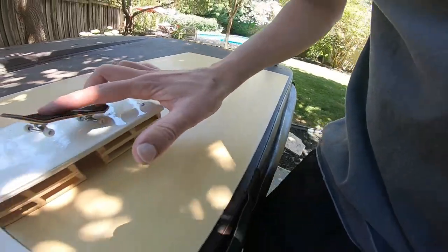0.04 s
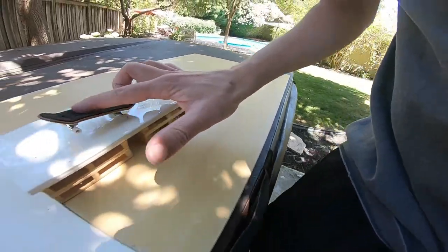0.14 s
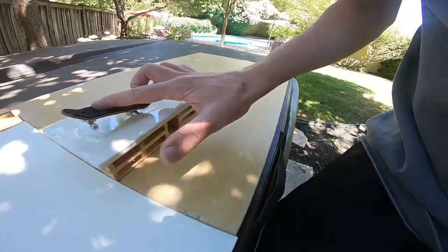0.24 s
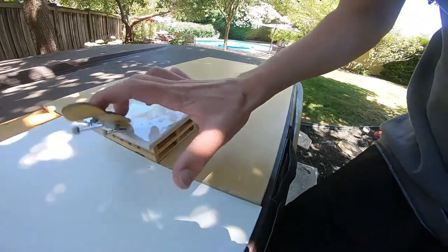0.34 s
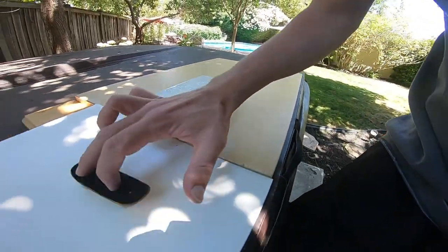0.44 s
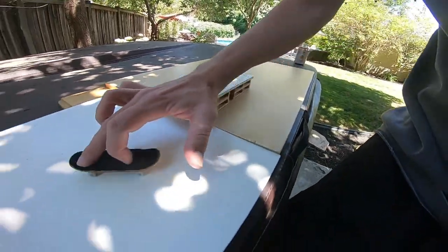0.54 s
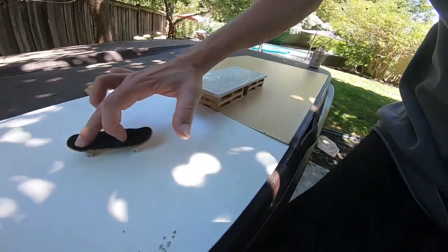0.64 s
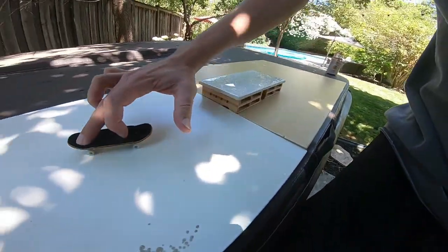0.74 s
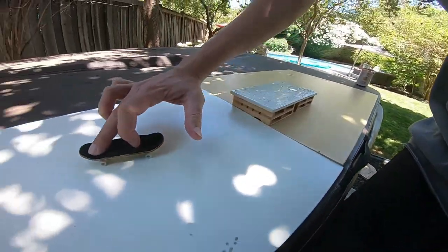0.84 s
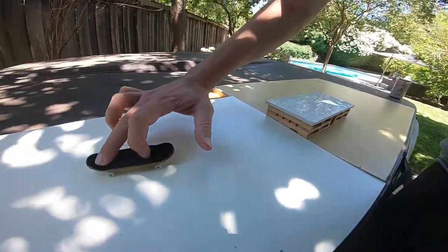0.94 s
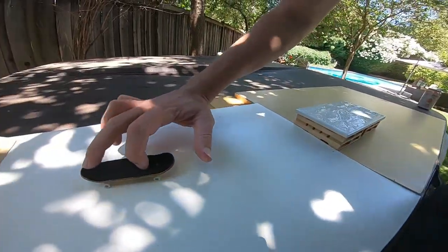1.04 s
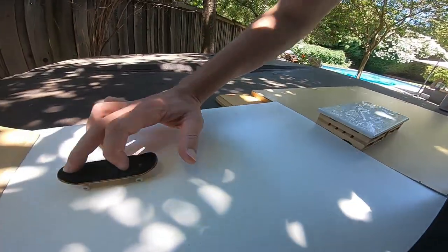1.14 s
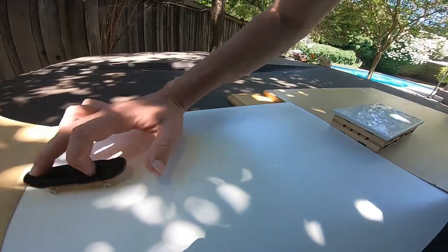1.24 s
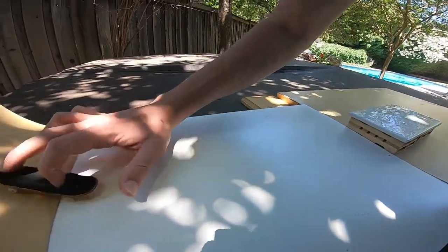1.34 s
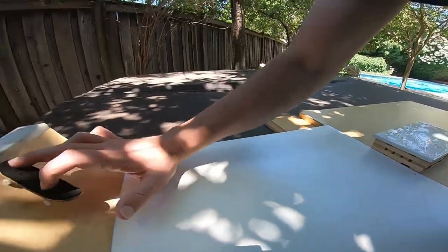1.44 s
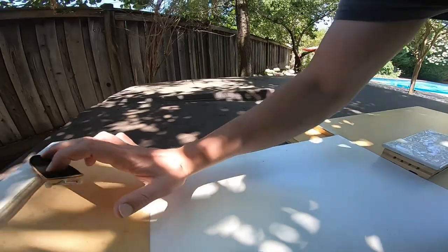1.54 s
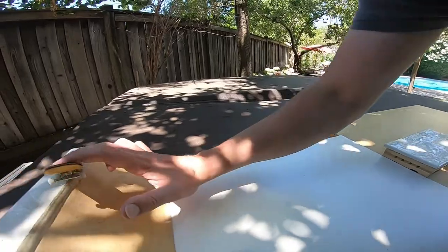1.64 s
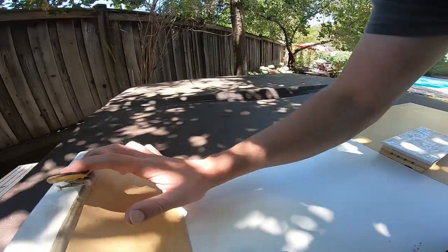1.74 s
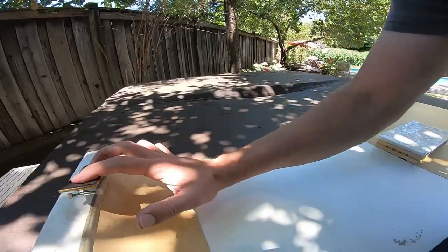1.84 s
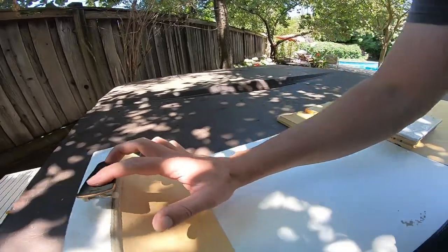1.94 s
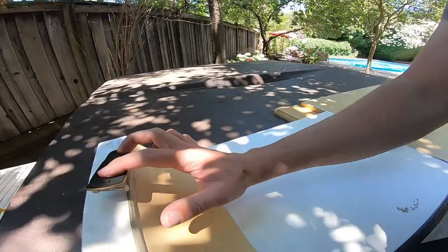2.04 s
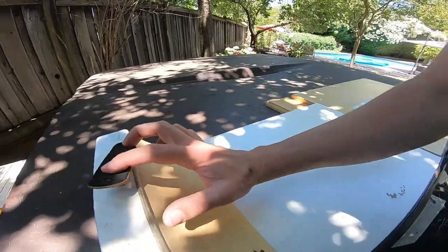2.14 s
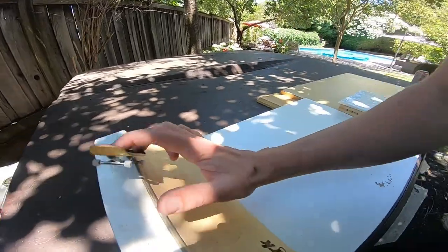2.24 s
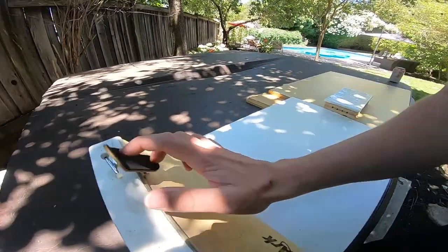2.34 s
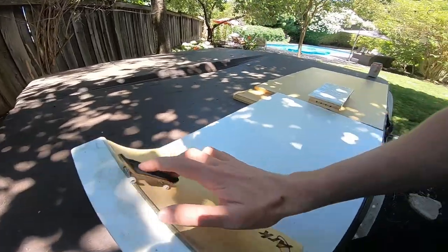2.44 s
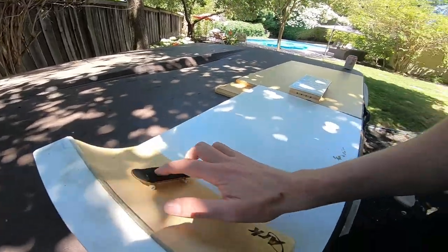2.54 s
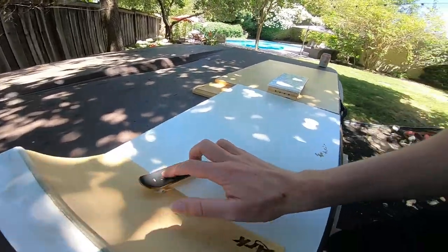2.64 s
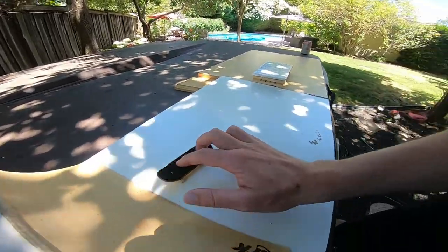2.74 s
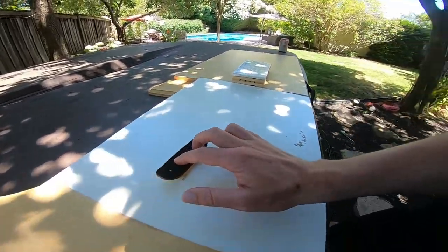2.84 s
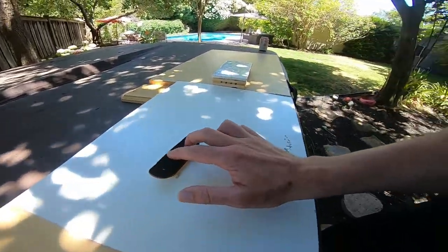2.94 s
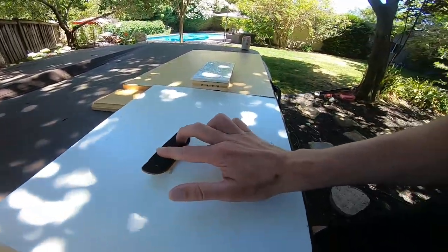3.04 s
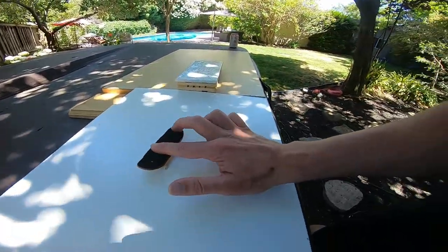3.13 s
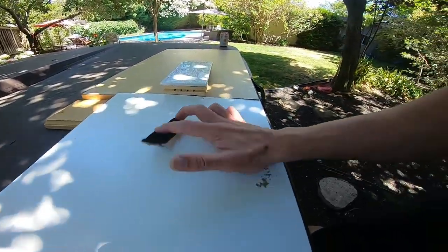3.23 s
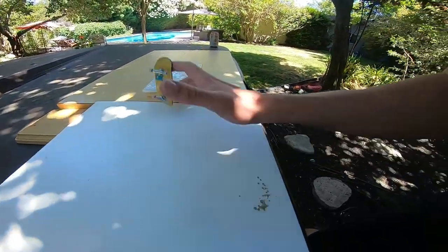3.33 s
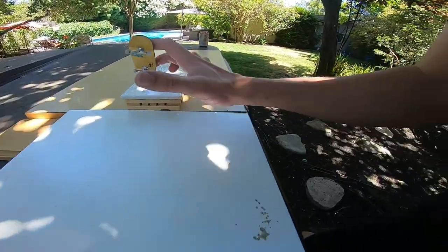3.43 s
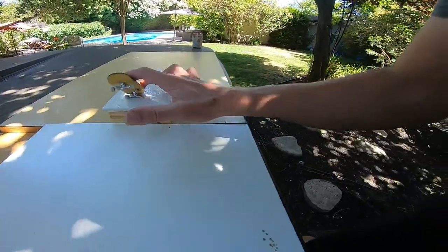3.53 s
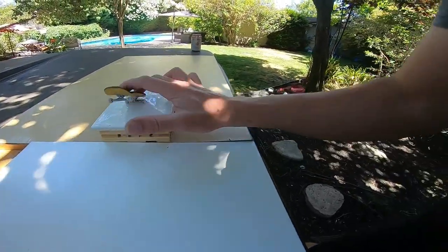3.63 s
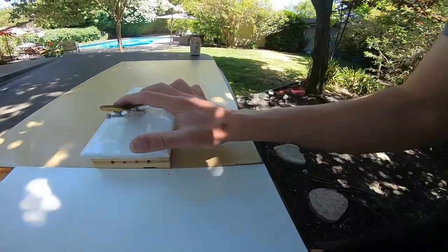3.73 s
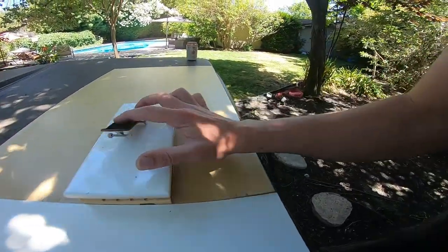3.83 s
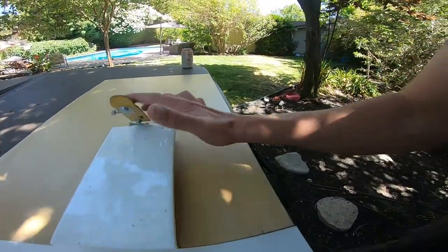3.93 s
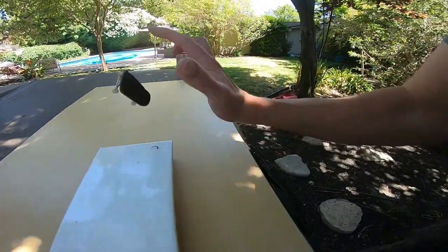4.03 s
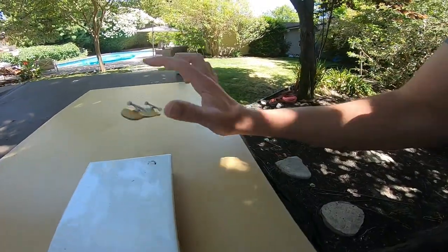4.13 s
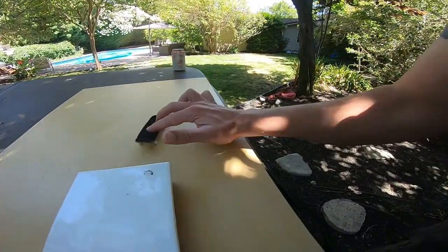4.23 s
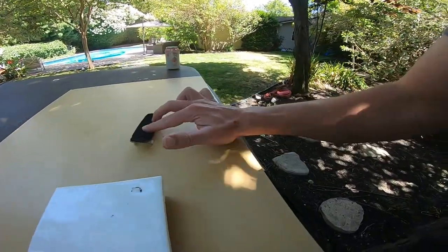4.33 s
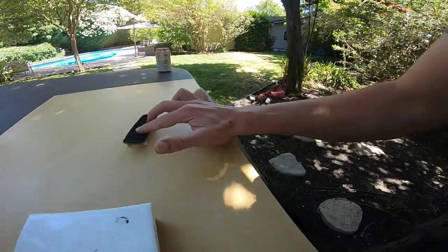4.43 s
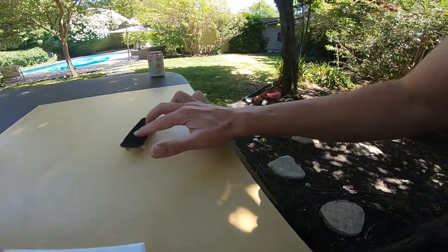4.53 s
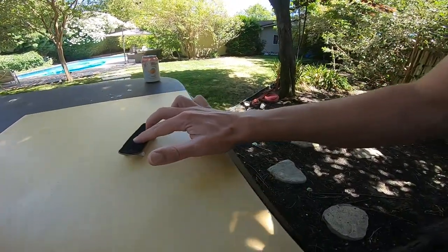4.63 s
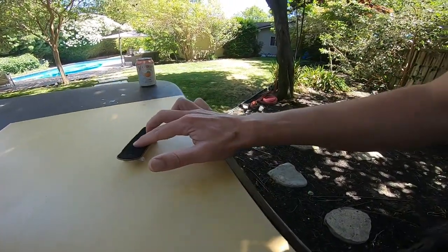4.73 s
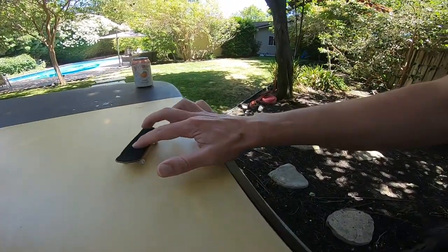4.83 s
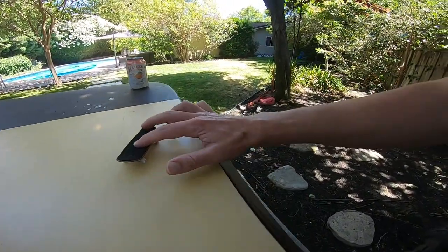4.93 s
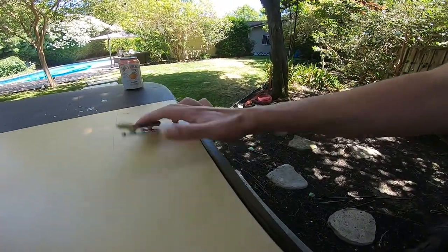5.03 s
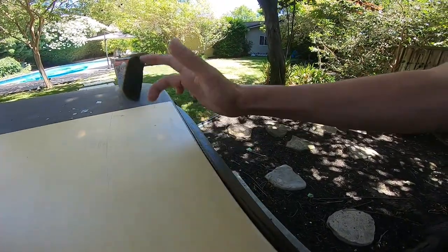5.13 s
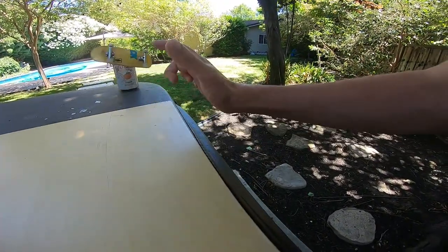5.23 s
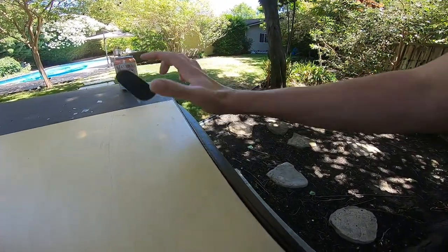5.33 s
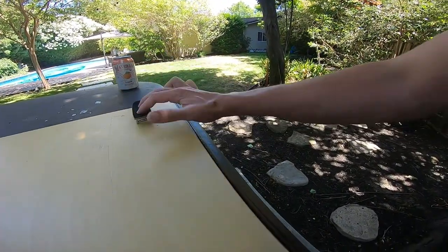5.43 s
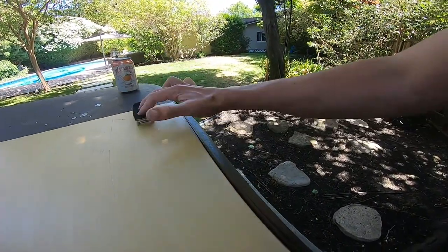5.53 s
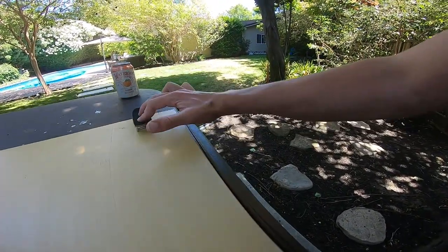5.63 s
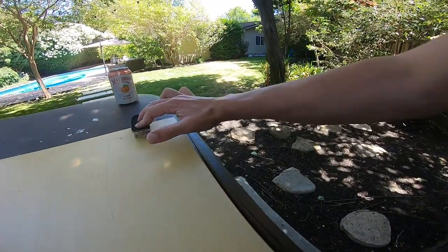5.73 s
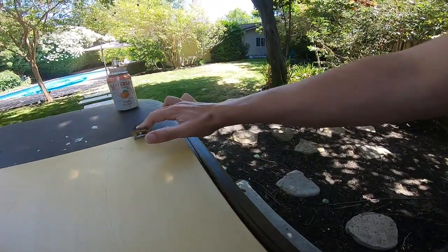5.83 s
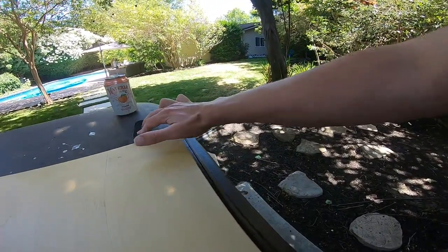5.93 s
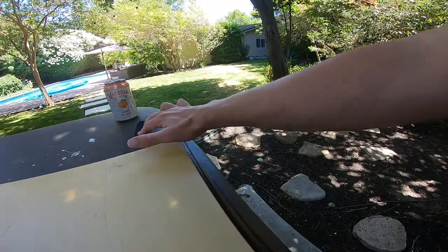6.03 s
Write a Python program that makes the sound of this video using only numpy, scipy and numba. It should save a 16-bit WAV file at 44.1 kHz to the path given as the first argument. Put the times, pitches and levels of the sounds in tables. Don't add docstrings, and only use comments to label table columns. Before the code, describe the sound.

Small dry wood and metal sounds close to a small microphone in a quiet garden: metallic scraping, a sharp double-edged clatter, rising wheel rumble with squeaks and ticks, and ramp knocks. After a lull come bright clacks, another roll, snappy pops and a clustered landing. Light rolling leads to one last pop and rattling catch, then dull taps. Faint low hum and outdoor rumble sit behind, with hardly any echo.

```python
import sys
import numpy as np
from scipy import signal
from scipy.fft import rfft, irfft, next_fast_len
from scipy.io import wavfile
from scipy.ndimage import uniform_filter1d
from numba import njit

SR = 44100
rng = np.random.default_rng(int(sys.argv[2]) if len(sys.argv) > 2 else 0)


def attenuation_scalar(level_db):
    decades = np.asarray(level_db, float) / 20
    return 10 ** decades


def file_out(sig):
    cols = np.atleast_2d(sig).T
    lim = np.clip(cols, -1, 1)
    pcm = np.round(lim * 32767).astype(np.int16)
    wavfile.write(sys.argv[1], SR, pcm)


N = 267761

# frequency in Hz, width in Hz, level in dB.
DECK_MODES = [(1070, 210, 6), (1777, 670, 13), (1840, 740, 17), (2420, 1000, -16.5)]
# frequency in Hz, width in Hz, level in dB.
AXLE_MODES = [(3350, 73, -2.5), (3712, 82, 5.5), (4070, 290, 1), (4950, 570, 0.5), (5230, 465, 1),
              (6070, 570, -2), (7130, 1370, -4.5)]
# frequency in Hz, gain in dB.
MIC_RESPONSE = [(5500, 0), (7500, -13), (9500, -51), (11000, -33.5), (13000, -30), (16500, -28.5)]


def unit(x):
    return x / np.sqrt(np.mean(x ** 2))


def peak(x):
    return x / np.abs(x).max()


def add(out, start_s, sound):
    i = int(start_s * SR)
    out[i:i + len(sound)] += sound


def colour(x, points):
    hz, db = np.transpose(points)
    size = next_fast_len(len(x))
    f = np.maximum(np.fft.rfftfreq(size, 1 / SR), 1)
    gain = attenuation_scalar(np.interp(np.log(f), np.log(hz), db))
    return irfft(rfft(x, size) * gain, size)[:len(x)]


@njit
def band(x, hz, width_hz):
    y, b, l = np.empty(len(x)), 0., 0.
    for i in range(len(x)):
        g, k = np.tan(np.pi * hz[i] / SR), width_hz / hz[i]
        v = (b + g * (x[i] - l)) / (1 + g * (g + k))
        b, l, y[i] = 2 * v - b, l + 2 * g * v, k * v
    return y


def ring(x, modes, spread_db=0.):
    gains = np.ones(len(modes))
    if spread_db:
        gains = attenuation_scalar(spread_db * rng.standard_normal(len(modes)))
    out = 0
    for k, (hz, width_hz, db) in enumerate(modes):
        b, a = signal.iirpeak(hz, hz / width_hz, SR)
        out = out + (-1) ** k * gains[k] * attenuation_scalar(db) * signal.lfilter(b, a, x)
    return out


def walk(rate_hz):
    k = int(SR / rate_hz)
    steps = np.repeat(rng.standard_normal(N // k + 1), k)
    return unit(uniform_filter1d(uniform_filter1d(steps, k), k)[:N])


def garden():
    # frequency in Hz, density in dB per Hz.
    air_spectrum = [(15, -45.5), (25, -18.5), (64, -9.5), (97, -18), (130, -2), (293, -8.5), (624, -21),
                    (1370, -27.5), (2450, -41), (3000, -60), (3700, -37), (5280, -41.5), (10400, -79),
                    (12500, -75), (16000, -89)]
    # frequency in Hz, level in dB rms.
    pump_tones = [(119.8, -48.5), (158, -57.5)]
    swell_db = 0.96 * walk(7.4) + 0.23 * walk(0.29)
    air = colour(rng.standard_normal(N) * attenuation_scalar(swell_db), air_spectrum)
    t = np.arange(N) / SR
    hum = 0
    for hz, db in pump_tones:
        level = attenuation_scalar(db + 1.0 * walk(13.0)) * np.sqrt(2)
        hum = hum + level * np.sin(2 * np.pi * hz * t + 0.087 * walk(3.1))
    return attenuation_scalar(-47) * unit(air) + hum


def grit(grain_db, flutter_db, rate_hz):
    level_db = grain_db * rng.exponential(size=N) + flutter_db * walk(rate_hz)
    return rng.standard_normal(N) * attenuation_scalar(level_db)


def pressure():
    # time in seconds, wheel load in dB, board ring in Hz.
    runs = [
        [(0.62, -67, 845), (0.706, -60, 789), (0.772, -50, 850), (0.83, -42.5, 800), (0.87, -43, 858),
         (0.934, -41.5, 840), (0.988, -41, 850), (1.09, -39.5, 845), (1.108, -31, 860)],
        [(1.108, -38.5, 836), (1.174, -35, 836), (1.22, -34, 772), (1.274, -35.5, 810), (1.334, -32.5, 837),
         (1.42, -34.5, 610), (1.468, -42.5, 642), (1.526, -55.5, 735), (1.56, -73, 653)],
        [(2.462, -29, 834), (2.542, -37, 868), (2.622, -35.5, 813), (2.878, -39.5, 910), (2.93, -33.5, 832),
         (2.96, -50, 853), (2.995, -37.5, 882), (3.142, -36.5, 797), (3.258, -42, 737), (3.285, -44, 675)],
        [(4.29, -56, 797), (4.38, -52.5, 872), (4.552, -47.5, 866), (4.614, -53, 790), (4.772, -53.5, 830),
         (4.834, -60.5, 700), (4.914, -54.5, 848), (4.996, -47, 745), (5.07, -44, 910)],
    ]
    # peak in seconds, metal in dB, wood in dB re metal,
    # rise and fall in seconds per 20 dB.
    scrapes = [(0, -45, -16, .01, 0.031), (.15, -64.5, 8, 0.67, 0.28), (0.33, -42.5, -6.5, 0.055, 0.038),
               (.445, -53, 10, 0.011, 0.011), (0.494, -23, -2.5, 0.04, 0.068),
               (0.598, -55.5, 5.5, 0.2, 0.27), (1.334, -48.5, 7.5, 0.27, 0.16),
               (1.6, -64.5, -18, 0.35, 0.3), (1.83, -75.5, 11.5, 0.11, 0.086),
               (2.3, -53.5, 1.5, 0.046, 0.028), (2.453, -38, 1.5, 0.084, 0.069),
               (2.594, -62, 24, 0.054, 0.039), (2.712, -62, 22, 0.087, 0.027), (3.1, -60.5, 9, 0.18, 0.33),
               (3.283, -47.5, -3, 0.1, 0.005), (3.586, -62.5, 3, 0.07, 0.19), (3.938, -52, 9, 0.11, 0.005),
               (4.27, -49.5, 2, 0.014, 0.12), (4.6, -92, -9, .6, 1), (5.073, -60.5, 13.5, 0.15, 0.0062),
               (5.4, -60.5, 23.5, 0.018, 0.015), (5.46, -46.5, -20, .03, 0.1),
               (5.886, -62.5, 13, 0.12, 0.09), (4.205, -52, -1, .02, 0.011), (.73, -50, -3, .02, .05)]
    # time in seconds, level in dB.
    spin = [(0.0, -81), (.11, -82), (.13, -70), (0.17, -80), (0.93, -105), (1.45, -70.5), (1.6, -89),
            (2.27, -92), (2.57, -80), (2.77, -97), (3.01, -99), (3.21, -86), (4.62, -100.5), (6.07, -93)]
    touch_s = 0.0078
    t = np.arange(N) / SR
    load = metal = wood = 0
    for s, db, _ in map(np.transpose, runs):
        contact_gain = np.clip(np.minimum(t - s[0], s[-1] - t) / touch_s, 0, 1)
        load = load + attenuation_scalar(np.interp(t, s, db)) * contact_gain
    for s, db, wood_db, rise_s, fall_s in scrapes:
        swell = attenuation_scalar(db - 20 * np.where(t < s, (s - t) / rise_s, (t - s) / fall_s))
        metal = metal + swell
        wood = wood + attenuation_scalar(wood_db) * swell
    s, _, hz = np.transpose(np.concatenate(runs))
    on_board = load + attenuation_scalar(-10.5) * wood
    on_deck = wood + attenuation_scalar(-40) * load
    on_axles = metal + attenuation_scalar(-27.5) * load + attenuation_scalar(-78)
    hiss = attenuation_scalar(-5 + np.interp(t, *np.transpose(spin)))
    on_sizzle = attenuation_scalar(-25.5) * on_axles + hiss
    return on_board, on_deck, on_axles, on_sizzle, np.interp(t, s, hz)


def rolling():
    # start and end in seconds, frequency and
    # width in Hz, # level in dB re axles.
    squeals = [(0, 0.388, 3090, 130, 1), (0, .1, 3350, 250, 5.5), (0.547, .76, 1530, 150, 0.5),
               (0.843, 0.998, 3350, 150, -5), (2.41, 2.528, 1960, 200, -2.5), (2.524, 2.625, 2880, 250, 2),
               (2.76, 2.96, 3240, 250, -6), (2.884, 2.962, 5200, 300, -3), (2.997, 3.16, 2480, 200, -3),
               (5.83, 5.92, 2010, 402, -6), (0, 0.37, 3640, 102, 3.5), (0.27, 0.34, 1390, 350, 1),
               (0.313, 0.327, 6370, 200, -4), (0.504, 0.566, 2870, 150, -9), (0.55, 0.625, 4120, 150, 4),
               (0.713, 0.765, 4180, 150, 15), (0.753, 1.123, 1740, 100, 8.5), (0.74, 0.973, 3350, 250, 3.5),
               (1.392, 1.514, 1870, 90, 2), (2.388, 2.603, 4950, 128, 5), (2.395, 2.6, 2830, 151, -0.5),
               (2.405, 2.538, 4130, 150, -4), (2.74, 2.87, 4650, 120, 1), (3.188, 3.29, 1430, 302, 9.5),
               (3.52, 3.644, 3860, 150, 2), (3.61, 3.922, 1636, 80, 6), (3.657, 3.96, 3710, 250, 6.5),
               (4.362, 4.797, 4000, 246, 0.5), (4.37, 4.757, 1180, 148.5, 15.5),
               (5.83, 5.893, 1180, 300, 11), (2.575, 2.634, 850, 140, 23), (1.1, 1.177, 874, 60, 22),
               (1.254, 1.325, 860, 101, 13.5), (0.75, 0.97, 4090, 150, 5), (3.22, 3.274, 4330, 300, -1),
               (3.3, 3.532, 5680, 200, -2), (4.36, 4.62, 3650, 110, 0.5), (4.647, 5.047, 3710, 200, 5),
               (4.655, 4.9, 4060, 109, -1), (4.43, 4.566, 1820, 90, 4), (4.992, 5.065, 1890, 200, 4),
               (2.462, 2.51, 3750, 150, 5.5), (2.74, 2.93, 1670, 200, 7), (5.44, 5.495, 4500, 300, -13),
               (.62, 0.73, 4150, 82, 2), (0.524, .56, 3400, 150, -3), (.505, .535, 1060, 150, -10),
               (0.44, .535, 2120, 150, -11), (3.3, 3.53, 6060, 300, 5), (0.58, 0.51, 5900, 700, -2),
               (2.42, 2.5, 3970, 180, -0.5), (2.52, 2.54, 4100, 150, -2), (2.4, 2.46, 3100, 150, 1.5),
               (1.17, 1.3, 662, 110, 14.5), (1.34, 1.4, 1130, 140, 9), (.77, .8, 3350, 150, 8),
               (5.9, 5.925, 3800, 200, 12)]
    # frequency in Hz, gain in dB.
    sizzle_spectrum = [(5500, -37.5), (8000, 0.5), (9500, -6.5), (11000, -15), (12500, -3.5), (15000, -15),
                       (16500, -52.5)]
    on_board, on_deck, on_axles, on_sizzle, board_hz = pressure()
    shared = grit(1.5, 1.3, 60)
    wood = shared + grit(1.8, 2.6, 30)
    rasp = shared + grit(2.6, 3.2, 50)

    narrow = band(band(shared, board_hz, 260.), board_hz * (1 + .035 * walk(15)), 150.)
    wide = band(band(band(shared, board_hz, 680.0), board_hz, 680.0), board_hz, 990.0)
    upper_hz = 1.218 * board_hz
    upper = band(band(wood, upper_hz, 200.), upper_hz, 130.)
    board = unit(narrow) + .3 * unit(wide)
    board += attenuation_scalar(-6.5) * unit(ring(wood, [(550, 227, 1)]))
    board += attenuation_scalar(-8.5) * unit(upper)

    deck = ring(wood, DECK_MODES)
    axles = unit(ring(rasp, AXLE_MODES))
    for start_s, end_s, hz, width_hz, db in squeals:
        part = slice(int(start_s * SR), int(end_s * SR))
        tone = ring(ring(rasp[part], [(hz, 3 * width_hz, 0)]), [(hz, width_hz, 0)])
        axles[part] += attenuation_scalar(db) * unit(tone) * signal.windows.tukey(len(tone), .35)
    sizzle = colour(rasp, sizzle_spectrum)
    body = unit(board) * on_board + unit(deck) * on_deck + axles * on_axles
    return colour(body, MIC_RESPONSE) + unit(sizzle) * on_sizzle


def contact(blow_db, chatter_s, tail_db, lead_in_db):
    t = np.arange(-1060, 5084) / SR
    after = np.maximum(t, 0)
    chatter = (t >= 0) * (np.exp(-after / chatter_s) + attenuation_scalar(tail_db) * np.exp(-after / 0.0029))
    lead_in = attenuation_scalar(lead_in_db) * np.exp(-np.abs(t) / 0.0063)
    grains = rng.standard_normal(len(t)) * attenuation_scalar(3.28 * rng.exponential(size=len(t)))
    return (lead_in + chatter) * grains + attenuation_scalar(blow_db) * (t == 0), after


def clink(crack_db, axle_hz):
    # frequency in Hz, gain in dB.
    crack_spectrum = [(3500, -27.5), (5200, -1), (6200, 10.5), (7300, -4), (9000, -13), (11000, -27.5),
                      (13000, -17.5), (15800, -26), (16600, -41)]
    force, after = contact(25.3, 0.0026, -14.5, -6.5)
    damped = [(hz, 2 * width_hz, db) for hz, width_hz, db in AXLE_MODES]
    axles = peak(ring(force, [(axle_hz, 330, 1)])) + .9 * peak(ring(force, damped, 1.5))
    from_blow = np.arange(len(force)) >= np.argmax(after > 0) - 1
    crack = colour(force * from_blow * (np.exp(-after / 0.0057) + 0.29), crack_spectrum)
    return colour(peak(axles), MIC_RESPONSE) + attenuation_scalar(crack_db + 15.0) * peak(crack)


def clack(thump_db, thump_hz, width_hz, deck_hz):
    force, after = contact(28.7, 0.0048, -17.0, -6.0)
    late = np.maximum(after - .0012, 0)
    push = late / .0003 * np.exp(-late / 0.00019)
    thump = ring(push, [(thump_hz, width_hz, 3), (1.9 * thump_hz, 120, -6), (62, 30, -18),
                        (155, 35, -9), (300, 28, -6), (600, 250, -6)])
    spot = ring(force, [(deck_hz, 260, 1)])
    deck = peak(spot) + .45 * peak(ring(force, DECK_MODES, 1.5))
    return colour(peak(deck) + attenuation_scalar(thump_db + 13.5) * peak(thump), MIC_RESPONSE)


def clacks():
    # time in seconds, deck and axle peaks in dB, deck and axle in Hz.
    sheet = [(.3231, -64, -55.5, 1380, 3600), (.4497, -12.5, -23.5, 1595, 3350),
             (.4551, -9.5, -27.5, 865, 3280), (.4803, -11.5, -14, 1480, 4240),
             (.4987, -28, -17.5, 2150, 3780), (.5187, -48, -27, 2340, 3130),
             (.7204, -33.5, -55, 1800, 4000), (.8155, -35, -54, 1730, 4000)]
    seam = [(1.1112, -38, -55, 866, 4000), (2.4797, -36, -22, 1220, 4000), (2.584, -43, -45, 980, 4900)]
    foot = [(1.3319, -14.5, -26.5, 990, 4600), (1.361, -21.5, -29, 953, 4300)]
    ramp = [(2.3748, -26.5, -30.5, 1840, 4290), (2.4044, -15.5, -14.5, 3010, 4480),
            (2.4265, -20.5, -24.5, 3050, 4900), (2.5102, -23.5, -33, 1100, 3730),
            (2.613, -14.5, -34, 990, 4930), (2.6224, -33.5, -25, 950, 3800),
            (2.7088, -21.5, -22.5, 1764, 4950), (2.721, -16.5, -26.5, 940, 4300)]
    lip = [(1.5105, -35.5, -30, 2120, 3200), (1.5812, -32.5, -27, 1100, 4030),
           (2.28, -33, -31.5, 1400, 3420), (2.286, -27.5, -31.5, 1330, 3580)]
    box = [(3.5377, -28.5, -17, 2240, 5900), (3.5418, -21, -19, 1255, 3850)]
    tail = [(3.2883, -19, -20.5, 1450, 3780)]
    nose = [(3.953, -27, -16.5, 1760, 3680), (5.0775, -16.5, -15.5, 1390, 3740)]
    table = [(4.2128, -10.5, -29, 790, 2370), (4.2152, -10, -23, 856, 2250),
             (4.2235, -12, -19.5, 920, 4480), (4.2256, -8.5, -25, 796, 2420),
             (4.2287, -34.5, -44, 956, 3500), (4.2506, -12.5, -14.5, 930, 3720),
             (4.2576, -19, -13.5, 1350, 4950), (4.2605, -12, -19, 980, 4240), (4.2667, -33, -38, 970, 4400)]
    edge = [(5.4056, -15, -16, 1310, 3730), (5.4117, -7.5, -37, 1286, 3900), (5.43, -11.5, -13, 1430, 3900),
            (5.4355, -13.5, -11.5, 1290, 3680), (5.4425, -27, -30, 1360, 5100)]
    rim = [(5.7555, -30, -56, 1210, 3400), (5.772, -24.5, -45.5, 2240, 3420),
           (5.7906, -21, -42, 1220, 3820), (5.9242, -16, -21, 1880, 3680)]
    # blows, thump in dB re a firm blow, thump frequency and width in Hz, crack in dB re axle.
    surfaces = [(sheet, -16.5, 473, 210, -15), (seam, -4, 720, 290, -23), (foot, -14, 630, 210, -21),
                (ramp, -22, 780, 220, -22.5), (lip, -29.5, 470, 49, -19.5), (box, -26, 625, 24, -16.5),
                (tail, -12, 442, 56, -9), (nose, -19, 292, 37, -15), (table, -18, 362, 78, -25.5),
                (edge, -20.5, 169, 31, -18.5), (rim, -15.5, 202, 95, -33.5)]
    # time in seconds, peak in dB, frequency in Hz.
    rattles = [(.012, -33, 3570), (0.077, -39.5, 3430), (.3655, -33, 3480), (0.4566, -15, 2860),
               (0.543, -21.5, 3480), (0.5668, -26, 3680), (0.602, -40, 4300), (.624, -39, 4060),
               (.7233, -39, 3870), (0.739, -39, 3940), (1.5385, -42.5, 5320), (1.5634, -45, 3700),
               (2.378, -45, 4700), (2.434, -18.5, 4780), (2.4543, -31, 5040), (2.579, -34, 4700),
               (2.616, -35.5, 4850), (4.2474, -26, 5200), (4.3082, -32.5, 3730), (4.2017, -33, 3900),
               (5.394, -38, 3870), (5.425, -15.5, 3880), (2.4417, -30, 4200), (2.4665, -33, 4200)]
    # time in seconds, peak in dB, frequency in Hz.
    grit_ticks = [(0.8613, -35, 3300), (0.8906, -39, 3400), (0.9994, -39, 3260), (1.0104, -36, 2550),
                  (1.0493, -37.5, 3850), (1.0714, -30.5, 2840), (1.1534, -34, 2720), (1.195, -30.5, 3320),
                  (1.293, -29, 3130),
                  (2.9868, -39.5, 4070), (3.0363, -31, 4700), (3.234, -26, 4350),
                  (4.4156, -48, 4130), (4.497, -49, 4120), (4.6726, -47, 3600), (4.7698, -48, 4030),
                 (4.7928, -52, 4060), (4.9145, -48, 3600), (4.936, -42, 3620), (5.013, -49, 3670),
                 (5.029, -30, 3520), (5.0661, -24, 3870)]
    firm_db, thump_give = -26, 0.19
    out = np.zeros(N + 6144)
    for blows, thump_db, thump_hz, width_hz, crack_db in surfaces:
        for s, deck_db, axle_db, deck_hz, axle_hz in blows:
            given_db = thump_db - thump_give * (deck_db - firm_db)
            knock = clack(given_db, thump_hz, width_hz, deck_hz)
            add(out, s, attenuation_scalar(deck_db) * knock + attenuation_scalar(axle_db) * clink(crack_db, axle_hz))
    for s, db, hz in rattles:
        add(out, s, attenuation_scalar(db) * clink(-31.5, hz))
    for s, db, hz in grit_ticks:
        add(out, s, attenuation_scalar(db - 4.5) * clink(-34, hz))
    out = out[1024:N + 1024]
    t = np.arange(SR // 3) / SR
    yard = unit(rng.standard_normal(len(t))) * np.exp(-np.log(1000) * t / 0.14)
    return out + attenuation_scalar(-44.0) * signal.fftconvolve(out, yard)[:N]


def knocks():
    # time in seconds, peak in dB, frequency and
    # width in Hz.
    soft_rings = [(0.45, -47, 65, 30), (0.485, -32, 150, 40), (3.2892, -19, 363, 35),
                  (3.289, -36, 584, 60), (3.54, -30.5, 169, 25), (3.541, -40, 62, 25),
                  (4.2159, -18, 320, 60), (4.2263, -22, 330, 50), (4.2525, -29.5, 298, 60),
                  (4.263, -24.5, 305, 29.6), (4.259, -26, 152, 40), (5.08, -35.5, 307, 30),
                  (5.081, -39, 90, 35), (5.409, -31, 145, 50), (5.433, -23.5, 140, 55),
                  (5.435, -23.5, 401, 35), (5.433, -37.5, 55, 25), (5.758, -25, 383, 60.4),
                  (5.758, -44, 60, 30), (5.7738, -19, 284, 90), (5.7942, -21, 285, 90),
                  (5.793, -30.5, 405, 30), (5.793, -26, 625, 40), (5.793, -38.5, 60, 30),
                  (5.9262, -31, 290, 60), (5.926, -35, 406, 70), (5.927, -30.5, 633, 45),
                  (1.1115, -26, 860, 70), (4.2135, -26, 810, 202), (4.256, -18, 735, 200),
                  (4.2655, -17.5, 750, 200), (4.27, -25, 660, 150), (5.4136, -20, 550, 150),
                  (5.4361, -14.5, 1320, 200), (5.7575, -27, 1270, 180), (5.792, -23, 1300, 180),
                  (5.768, -28, 494, 150),
                  (2.4045, -21.5, 3400, 200), (2.4052, -14, 4950, 130), (2.406, -20, 4500, 150),
             (2.4045, -25.5, 4600, 270), (2.4541, -27, 4880, 150), (2.4287, -25, 2950, 150),
             (0.5675, -28, 4050, 120), (0.579, -29, 4100, 100), (0.589, -28, 4500, 120),
             (0.6239, -27.5, 4210, 100), (.604, -30, 4150, 100), (.752, -35, 4200, 100),
             (.5525, -29, 3550, 150), (2.6235, -19.5, 860, 220), (2.721, -21, 770, 360),
             (5.4325, -15, 4150, 200), (3.3, -45, 5700, 60), (3.5425, -20, 3900, 93),
             (5.7558, -24, 1230, 120), (4.2145, -16, 950, 300), (4.2525, -19, 900, 300),
             (4.2565, -19, 900, 300), (.4512, -18, 1700, 400), (3.5418, -22, 1200, 200),
             (4.2135, -18, 2320, 230), (4.2605, -15.5, 980, 500), (5.4305, -18.5, 2600, 350),
             (5.44, -24, 2400, 200), (5.4068, -14, 1300, 300), (4.2288, -21, 700, 250),
             (0.7215, -36, 4200, 150), (3.1, -30, 1920, 250)]
    out, t = np.zeros(N + SR), np.arange(SR // 5) / SR
    for s, db, hz, width_hz in soft_rings:
        push = np.gradient(t * np.exp(-t * hz / 0.21))
        add(out, s, attenuation_scalar(db) * peak(ring(push, [(hz, width_hz, 0)])))
    return colour(out[:N], MIC_RESPONSE)


def whines():
    # start and end in seconds, frequency in Hz, level in dB rms.
    thin_tones = [(3.28, 3.52, 8540, -91), (3.29, 3.53, 6200, -84), (4.27, 5.4, 7214, -91),
                  (5.074, 5.4, 7620, -85), (5.08, 5.4, 5744, -89), (5.44, 5.9, 6550, -88),
                  (5.45, 6.07, 7420, -92), (5.2, 5.4, 3290, -87)]
    out, t = np.zeros(N), np.arange(N) / SR
    for start_s, end_s, hz, db in thin_tones:
        wave = np.sqrt(2) * np.sin(2 * np.pi * hz * t + 1.6 * walk(40))
        part = slice(int(start_s * SR), int(end_s * SR))
        tone = (wave * attenuation_scalar(db + 4 * walk(12)))[part]
        out[part] += tone * signal.windows.tukey(len(tone), .1)
    return out


def scene():
    # frequency in Hz, side minus mid in dB.
    side_spectrum = [(60, -34), (110, -41.5), (200, -30), (380, -38), (700, -36), (1290, -45), (2380, -37),
                     (4400, -30), (8120, -16.5), (15000, 5)]
    mid = garden() + rolling() + clacks() + knocks() + whines()
    scatter = rng.standard_normal(2048) * np.exp(-np.arange(2048) / 500)
    scattered = signal.fftconvolve(mid, scatter / np.linalg.norm(scatter))[:N]
    side = colour(scattered, side_spectrum)
    return np.array([mid + side, mid - side])


def roll_off(x):
    return signal.sosfilt(signal.butter(12, 16530, fs=SR, output="sos"), x)


def record(dry):
    rounded = np.tanh(1.15 * dry) / 1.054
    return roll_off(rounded)


dry = scene()
out = record(dry)
file_out(out)
```